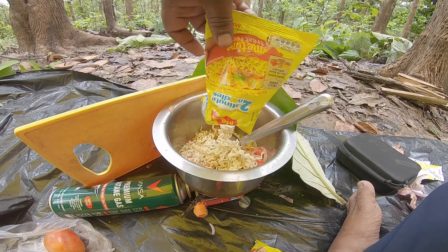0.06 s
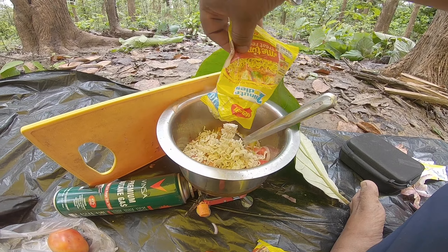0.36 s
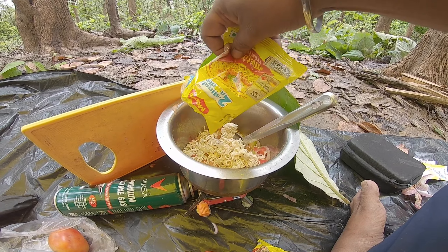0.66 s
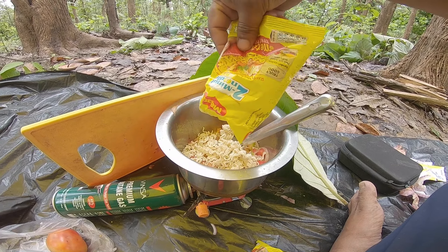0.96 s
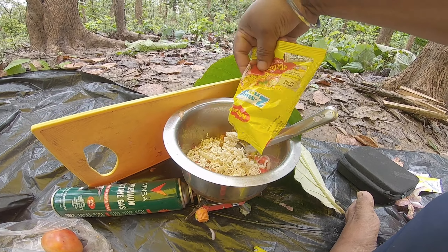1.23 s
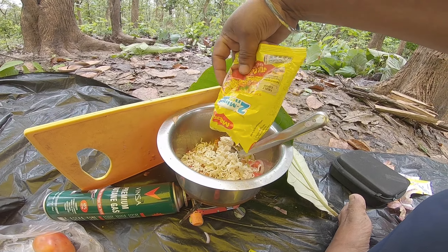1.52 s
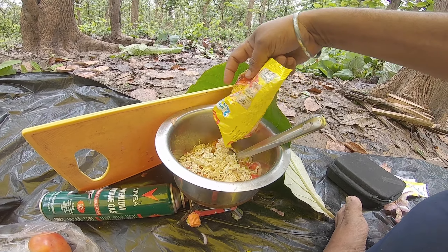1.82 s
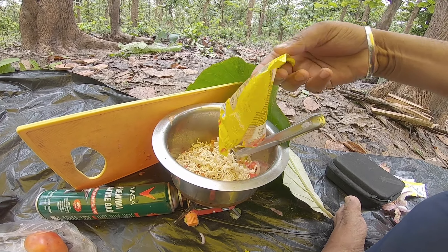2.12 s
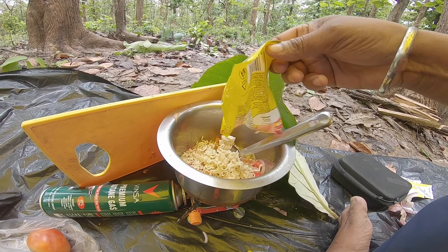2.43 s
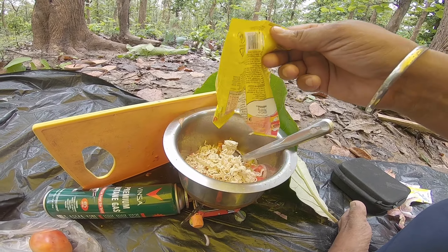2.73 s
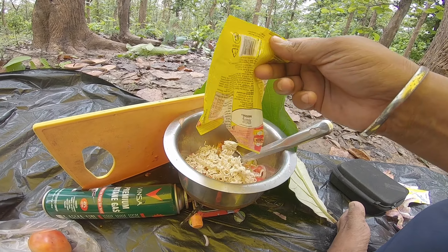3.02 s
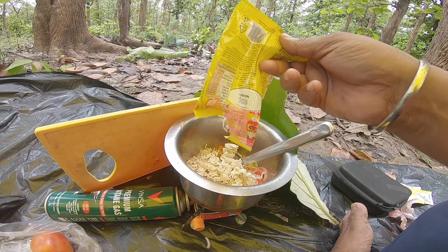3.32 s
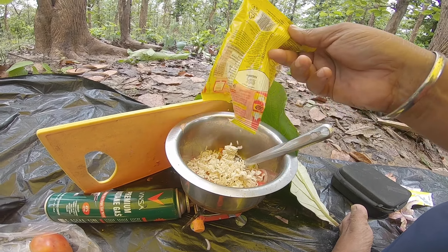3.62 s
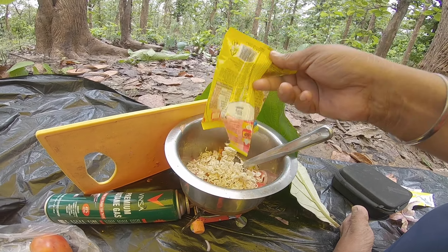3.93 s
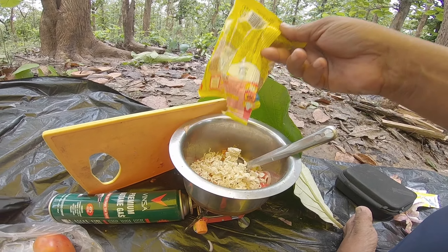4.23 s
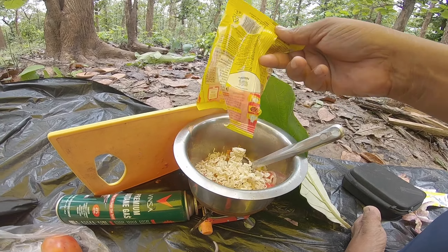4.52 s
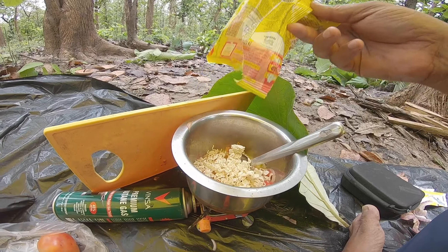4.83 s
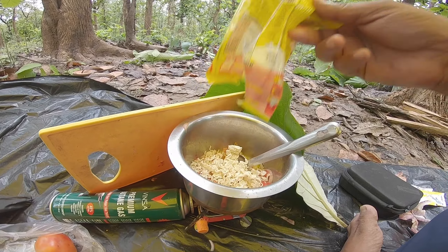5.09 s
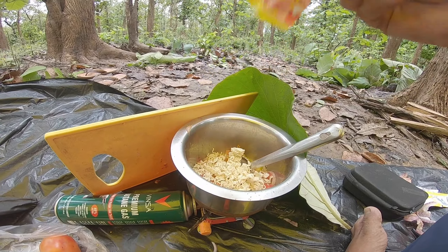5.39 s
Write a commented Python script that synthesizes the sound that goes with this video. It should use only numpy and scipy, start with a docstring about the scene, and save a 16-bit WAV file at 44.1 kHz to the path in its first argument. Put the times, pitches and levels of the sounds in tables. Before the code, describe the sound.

A portable gas stove hisses steadily outdoors for the whole five and a half seconds, with a slight ring from the burner and a faint high crackle. Underneath, the flame throbs softly and a light wind rumbles in short, uneven gusts. From the start, hands work a thin plastic packet close by. Quick crinkles cluster around 0.5 seconds and again from 1 to 1.5 seconds, mixed with light fingertip taps and brief swishes of plastic sliding over itself. A sharp crinkle comes at 1.8 seconds, and the handling eases shortly after 2 seconds. Another spell of squeezing and rustling runs from about 2.8 to 4 seconds, with a distinct tap near 3.3 seconds. After that the packet grows quieter, leaving a few small crinkles and tiny sharp ticks between 4.4 and 5.5 seconds. Everything sounds close and straight ahead.

```python
"""A portable gas stove hisses steadily throughout, under a pot, outdoors beneath a tarp.
Its gas jet rings in the burner, while the flame and a light wind rumble below.
Close by, hands work a thin packet: tiny creases slip and make it rustle in spells,
folds buckle in short crinkles, film slides over film, fingers tap it,
and stiff creases flip with tiny sharp ticks."""
import sys
import numpy as np
from scipy import signal
from scipy.fft import rfft, irfft, next_fast_len
from scipy.io import wavfile

SR = 44100
rng = np.random.default_rng(int(sys.argv[2]) if len(sys.argv) > 2 else 0)


def int16_out(signal):
    """Quantize to a 16-bit WAV file."""
    q = np.round(np.clip(np.atleast_2d(signal).T, -1, 1) * 32767)
    wavfile.write(sys.argv[1], SR, q.astype(np.int16))


N = 244975


def from_db(db):
    """Turn decibels into a number to multiply a sound by."""
    return 10 ** (np.asarray(db) / 20)


def rms_one(x):
    """Scale a signal so that its average strength (rms) is 1."""
    return x / np.sqrt(np.mean(x ** 2) + 1e-20)


def curve(rows):
    """Join (time_s, value) points with straight lines."""
    return np.interp(np.arange(N) / SR, *np.transpose(rows))


def wobble(rate_hz, limit=1.47):
    """A smooth random wander within +-limit, changing about rate_hz times a second."""
    hz = np.fft.rfftfreq(2 ** 18, 1 / SR)
    noise = rng.standard_normal(2 ** 18)
    slow = irfft(rfft(noise) / (1 + (hz / rate_hz) ** 2))[:N]
    return limit * np.tanh(rms_one(slow) / limit)


def swells(rows, roundness):
    """Each row rises and falls in one arch; a smaller roundness gives a flatter top."""
    power, t = np.zeros(N), np.arange(N) / SR
    for start_s, length_s, level_db in rows:
        inside = (t > start_s) & (t < start_s + length_s)
        arch = np.sin(np.pi * (t[inside] - start_s) / length_s) ** roundness
        power[inside] += (from_db(level_db) * arch) ** 2
    return np.sqrt(power)


def colour(x, tone, resonances=()):
    """Make some pitches stronger and others weaker; white noise keeps its overall level."""
    size = 2 * next_fast_len(N // 2 + 4096)
    hz = np.fft.rfftfreq(size, 1 / SR) + 1e-6
    pitch_hz, level_db = np.transpose(tone)
    db = np.interp(np.log(hz), np.log(pitch_hz), level_db)
    for centre_hz, width_hz, boost_db in resonances:
        db = db + boost_db / (1 + (2 * (hz - centre_hz) / width_hz) ** 2)
    # make the ringing come after each click, never before (minimum phase)
    cepstrum = irfft(np.log(rms_one(from_db(db))))
    cepstrum[1:size // 2] *= 2
    cepstrum[size // 2 + 1:] = 0
    return irfft(rfft(x, size) * np.exp(rfft(cepstrum)))[..., :N]


def band(x, low_hz, high_hz):
    """Keep the pitches between low_hz and high_hz."""
    return signal.sosfilt(signal.butter(2, [low_hz, high_hz], "band", fs=SR, output="sos"), x + 1e-18)


def clicks(per_s, spread_db):
    """Clicks of uneven size at random moments."""
    sizes = from_db(spread_db * np.minimum(rng.exponential(1, N), 4)) * rng.choice([-1, 1], N)
    return rms_one(sizes * (rng.random(N) < per_s / SR))


# The tone of the gas jet: pitch_hz, level_db
JET_TONE = [(200, -6.5), (480, -7), (850, 1.5), (1100, -5.5), (2100, -8.5), (2900, -4), (4500, -2.5),
            (6400, -4), (8300, -1.5), (9500, -12.5), (11000, -20), (14000, -25.5), (16000, -34)]
# Where the burner tube and the gap under the pot ring: pitch_hz, width_hz, boost_db
BURNER_RESONANCES = [(688, 260, 14), (1674, 340, 10.5), (2554, 160, 11.5), (2846, 130, 7.5),
                     (3708, 290, 11.5), (4100, 150, -14), (5565, 1160, 16.5), (7040, 260, 1.5),
                     (8150, 250, 0.5), (12470, 1500, 12.5)]


def gas_hiss(level_db=-49, waver_db=0.2, flutter_db=1.13):
    """The gas jet hisses through the ringing burner, with a slight flutter."""
    jet = rng.standard_normal(N) * from_db(waver_db * wobble(2.8) + flutter_db * wobble(90))
    return from_db(level_db) * colour(jet, JET_TONE, BURNER_RESONANCES)


# The tone of the wind: pitch_hz, level_db
WIND_TONE = [(15, -26.5), (30, -7.5), (52, 0.5), (90, 0.5), (115, -3), (150, -13), (300, -26), (800, -52.5)]
# Gusts of the light wind: start_s, length_s, level_db
WIND_GUSTS = [(0, 0.086, -49), (.25, 0.32, -49), (.73, 0.091, -45), (1.02, 0.11, -47), (1.25, 0.3, -45.5),
              (2.27, 0.16, -46.5), (2.52, 0.067, -50), (2.84, 0.18, -50), (3.13, 0.21, -46.5),
              (3.45, .55, -50.5), (4.08, 0.084, -46.5), (4.35, 0.13, -52), (5.02, 0.14, -48)]
GUST_ROUNDNESS = 0.37


def wind(breeze_db=-54, trim_db=-0.1, buffet_db=2.5):
    """A breeze buffets in the deep bass, with gusts on top."""
    blowing = np.hypot(from_db(breeze_db), swells(WIND_GUSTS, GUST_ROUNDNESS))   # hypot adds powers
    air = colour(rng.standard_normal(N), WIND_TONE)
    return air * blowing * from_db(trim_db + buffet_db * wobble(11))


# The tone of the flame: pitch_hz, level_db
FLAME_TONE = [(70, -19.5), (120, -5.5), (150, 1), (186, 2), (230, -5.5), (280, -8.5), (350, -18),
              (520, -25.5), (1000, -46)]
# Moments when its roar swells: start_s, length_s, level_db
FLAME_FLARES = [(.27, 0.084, -48), (.53, 0.073, -45), (1.19, 0.15, -47.5), (1.68, .08, -52),
                (2.03, 0.12, -47), (2.82, 0.26, -45), (3.23, 0.083, -42.5), (4.2, 0.14, -53)]


def flame(steady_db=-50.5, gust_share=0.18, throb_db=1.9):
    """The flame throbs about an octave above the wind, fanned by the gusts."""
    fanned = from_db(steady_db) + gust_share * swells(WIND_GUSTS, GUST_ROUNDNESS)
    roaring = np.hypot(fanned, swells(FLAME_FLARES, roundness=0.35))
    roar = colour(rng.standard_normal(N), FLAME_TONE)
    return roar * roaring * from_db(throb_db * wobble(24))


# The tone of the faint crackle: pitch_hz, level_db
CRACKLE_TONE = [(2300, -6), (3500, 3.0), (5500, -3.5), (7200, 1.5), (8500, -2), (10500, -19.5),
                (13000, -12), (16000, -18.5)]


def fine_crackle(level_db=-56.5, clump_db=10.0, patchy_db=10.0):
    """Faint high crackle runs through the hiss, each little spurt at a pitch of its own."""
    shared_db, spurts = clump_db * wobble(120), 0
    edges_hz = np.geomspace(2300, 16000, 15)
    for low, high in zip(edges_hz, edges_hz[1:]):
        crackle = band(clicks(per_s=5000, spread_db=3.0), low, high)
        spurts += crackle * from_db(shared_db + patchy_db * wobble(130))
    return from_db(level_db) * colour(rms_one(spurts), CRACKLE_TONE)


# How hard the hands work the packet between squeezes: time_s, level_db
HAND_EFFORT = [(0, -50.5), (.7, -48.5), (1.0, -45), (1.25, -40), (1.45, -43), (1.58, -49.5), (1.78, -45.5),
               (1.98, -43), (2.2, -50.5), (2.55, -47.5), (2.72, -52), (3.02, -44), (3.4, -49), (3.9, -50.5),
               (4.3, -55.5), (5.55, -50.5)]
# Squeezes of the packet: start_s, length_s, level_db
HAND_SQUEEZES = [(.11, 0.054, -47), (.275, 0.065, -40.5), (.5, 0.12, -36.5), (1.035, 0.1, -38.5),
                 (1.81, 0.018, -35.5), (2.41, 0.026, -46), (2.56, 0.062, -47), (2.81, 0.064, -37),
                 (2.96, 0.056, -41), (3.22, 0.13, -37), (3.5, 0.076, -39.5), (3.685, 0.067, -39.5),
                 (3.9, 0.052, -42), (4.11, 0.046, -43), (5.085, 0.034, -42)]


def handling():
    """How strongly the packet is worked: steady effort, with squeezes on top."""
    return np.hypot(from_db(curve(HAND_EFFORT)), swells(HAND_SQUEEZES, roundness=0.87))


# The tone of the packet's thin film: pitch_hz, level_db
FILM_TONE = [(150, -5.5), (400, -8), (700, 1.5), (1100, -2.5), (2000, -1.5), (3300, 0.5), (4400, 0.5),
             (5600, -9), (7000, -0.5), (8300, -10), (10500, -18), (12500, -21), (16000, -27)]
# Where the hollow inside the packet rings: pitch_hz, width_hz, boost_db
PACKET_RESONANCES = [(660, 136, 5.5), (1610, 295, 6), (3450, 88, 4)]
# The pitch that the grip brings out in the film: time_s, pitch_hz
GRIP_PITCH = [(0, 3000), (.9, 2900), (1.08, 845), (1.33, 756), (1.41, 3280), (2.1, 3050), (2.5, 1730),
              (3.2, 1490), (3.7, 1840), (3.95, 2730), (5.55, 2870)]


def rustle(level_db=-4.5, clump_db=3.5, patchy_db=3.5, grip_db=4.0, grip_octaves=0.62):
    """Tiny creases slip in clumps, each clump favouring its own range of pitches."""
    shared_db, grip_hz, creases = clump_db * wobble(55), curve(GRIP_PITCH), 0
    edges_hz = [150, 600, 1250, 1950, 2800, 4000, 8000, 19000]
    for low, high in zip(edges_hz, edges_hz[1:]):
        slips = band(clicks(per_s=4500, spread_db=3.0), low, high)
        octaves_away = np.log2(np.sqrt(low * high) / grip_hz)
        nearness = np.exp(-(octaves_away / grip_octaves) ** 2)
        creases += slips * from_db(shared_db + patchy_db * wobble(84) + grip_db * nearness)
    return handling() * from_db(level_db) * rms_one(colour(creases, FILM_TONE, PACKET_RESONANCES))


def crease_pops(level_db=-12.5, per_s=70, cycles=1.9, follow=0.79, range_db=7.5):
    """Single small creases pop and ring for a few cycles, louder while the packet is worked."""
    pops, handling_db = np.zeros(N), 20 * np.log10(handling())
    loudness = from_db(level_db + follow * handling_db + (1 - follow) * handling_db.mean())
    age = np.arange(SR // 100) / SR
    for when, pitch, size in rng.random((int(per_s * N / SR), 3)):
        at, hz = int(when * (N - len(age))), 1900 * 2.5 ** pitch
        ring = np.sin(2 * np.pi * hz * age) * np.exp(-age * hz / cycles)
        pops[at:at + len(age)] += from_db(range_db * size) * ring
    return loudness * rms_one(pops)


# The tone of a crinkle's bright edge: pitch_hz, level_db
EDGE_TONE = [(3000, -37), (5500, -10), (7000, 4.5), (8400, 5.5), (10500, -12.5), (12500, -5.5),
             (16000, -7)]
# Folds buckling: start_s, level_db, crispness_db, pitch_hz
BUCKLING_FOLDS = [(0.0468, -25.5, -19, 3140), (0.114, -30, -20, 2380), (0.13, -34, -22, 2970),
                  (0.160, -29.5, -21, 3620), (0.277, -38, -21, 3250), (0.357, -32.5, -13, 3730),
                  (0.464, -28, -13, 3540), (0.4937, -31, -19, 3400), (0.5062, -29.5, -10, 3320),
                  (0.5334, -33, -6, 3300), (0.546, -32, -6, 3160), (0.567, -31, -7, 3040),
                  (0.5744, -28, -10, 3000), (0.589, -28, -22, 2940), (0.604, -30.5, -12, 3070),
                  (0.6114, -34, -6, 3170), (0.7503, -36, -5, 1690), (0.881, -31, -6.5, 2900),
                  (0.8936, -31, -11, 2800), (0.9487, -36, -22, 2860), (0.9778, -30, -28, 2770),
                  (1.105, -30, -21, 1760), (1.153, -31, -12, 2500), (1.256, -31, -28, 2750),
                  (1.275, -32, -8, 3460), (1.3334, -30, -10, 1800), (1.379, -32, -9, 3600),
                  (1.438, -34, -22, 3400), (1.476, -42.5, 4.5, 3600), (1.4933, -27.5, -22, 3500),
                  (1.602, -32, -20, 3000), (1.8192, -26, -18, 3170), (2.005, -35.5, -19, 3000),
                  (2.0314, -36, -21, 3460), (2.0756, -31, -8, 3400), (2.48, -30, -10, 2800),
                  (2.8362, -30, -13, 1590), (2.974, -34, -24, 1490), (3.117, -34.5, -17, 3250),
                  (3.235, -32.5, -7, 2390), (3.282, -30, -22, 1650), (3.3085, -30.5, -28, 2320),
                  (3.706, -35, -12, 1610), (3.7314, -39, -17, 2480), (3.863, -34, -4, 3220),
                  (3.9444, -33, -14, 3220), (4.326, -32.5, -24, 3400), (4.8343, -32.5, -15, 3700),
                  (5.0944, -39.5, -18, 1520)]


def crinkles(body_db=-9.5, ring_db=-13.0, edge_db=-6.5, sheen_db=-6.0, rise_s=0.0027, ring_ratio=1.049):
    """A buckling fold lets go a quick run of snaps: a papery body, its own pitch and a bright edge."""
    body, rings, edge, sheen = np.zeros((4, N))
    snaps = clicks(per_s=16000, spread_db=1.0)
    for start_s, level_db, crispness_db, pitch_hz in BUCKLING_FOLDS:
        at = int(start_s * SR)
        progress = np.arange(min(SR // 10, N - at)) / SR / rise_s   # 1 at the loudest moment
        span = slice(at, at + len(progress))
        swell = from_db(level_db) * progress ** 2 * np.exp(2 - 2 * progress)
        run = swell * rms_one(snaps[span])
        ring = swell * band(snaps[span], pitch_hz / ring_ratio, pitch_hz * ring_ratio)
        body[span] += from_db(body_db) * run
        rings[span] += from_db(ring_db) * rms_one(ring) * np.std(run)
        edge[span] += from_db(crispness_db + edge_db) * run
        sheen[span] += from_db(2 * crispness_db + sheen_db) * run   # only crisp folds reach the very top
    papery = colour(band(body, 230, 5500), FILM_TONE, PACKET_RESONANCES)
    return papery + rings + colour(edge, EDGE_TONE) + band(sheen, 9300, 13500)


# The tone of rubbing film: pitch_hz, level_db
SWISH_TONE = [(4000, -35), (6500, 6.5), (8600, 7), (10800, -13), (12400, -1), (16000, -24)]
# Film sliding over film: start_s, level_db, length_s
FILM_SLIDES = [(0.53, -52, 0.042), (1.48, -53, 0.033), (2.815, -54, 0.044), (3.69, -47, 0.022),
               (3.843, -51, 0.076), (5.225, -59, .02)]


def slides(chatter_db=2.0):
    """Film rubs on film with a short, bright, grainy swish."""
    strokes, t = np.zeros(N), np.arange(N) / SR
    for start_s, level_db, length_s in FILM_SLIDES:
        progress = np.clip((t - start_s) / length_s, 0, 1)
        strokes += from_db(level_db) * np.sqrt(np.abs(np.sin(np.pi * progress)))
    rub = clicks(per_s=6900, spread_db=-8.0) * from_db(chatter_db * wobble(150))
    return strokes * rms_one(colour(rub, SWISH_TONE))


# Fingers knocking on the packet: start_s, level_db, pitch_hz
FINGER_TAPS = [(0.581, -30.5, 203), (0.7529, -34, 1500), (1.159, -32, 730), (1.19, -33, 1010),
               (1.821, -40, 706), (2.4831, -42, 1640), (3.2827, -28, 1570), (3.2847, -34, 243),
               (5.0957, -36, 2000)]


def taps(cycles=1.76, contact_s=0.00045):
    """A fingertip taps the packet: a dry crack, then a note that dies almost at once."""
    notes, cracks, age = np.zeros(N), np.zeros(N), np.arange(SR // 20) / SR
    for start_s, level_db, pitch_hz in FINGER_TAPS:
        at, gain = int(start_s * SR), from_db(level_db)
        span = slice(at, at + len(age))
        notes[span] += gain * np.sin(2 * np.pi * pitch_hz * age) * np.exp(-age * pitch_hz / cycles)
        cracks[span] += gain * rng.standard_normal(len(age)) * np.exp(-age / contact_s)
    return notes + colour(cracks, FILM_TONE, PACKET_RESONANCES)


# Sharp ticks of the film: start_s, level_db, pitch_hz
FILM_TICKS = [(1.8208, -36, 8200), (2.402, -35, 6800), (3.433, -33.5, 7200), (3.868, -41, 7200),
              (3.879, -36, 8500), (4.469, -33.5, 7500), (4.694, -27.5, 8300), (4.9757, -33, 7300),
              (5.229, -37, 6800), (5.3112, -30.5, 6400), (5.465, -30.5, 8200)]


def ticks(boost_db=6.5, decay_s=0.00027, crack_share=0.31):
    """A stiff crease flips: a crack that rings for a few cycles."""
    flips, age = np.zeros(N), np.arange(SR // 100) / SR
    for start_s, level_db, pitch_hz in FILM_TICKS:
        at = int(start_s * SR)
        ring = np.sin(2 * np.pi * pitch_hz * age) + crack_share * rng.standard_normal(len(age))
        flips[at:at + len(age)] += from_db(level_db + boost_db) * ring * np.exp(-age / decay_s)
    return band(flips, 2400, 10200)


def smear(x, decay_s=0.024):
    """Blur a sound into a brief, dense cloud, as strong as what goes in."""
    age = np.arange(SR // 12) / SR
    cloud = rng.standard_normal(len(age)) * np.exp(-age / decay_s)
    return signal.fftconvolve(x, cloud / np.linalg.norm(cloud))[:N]


def scene(lean_db=-8.0, low_mid_spread_db=-34.0):
    """Everything is close and straight ahead; the highest treble spreads out and leans right."""
    packet = rustle() + crease_pops() + crinkles() + slides() + taps() + ticks()
    centre = gas_hiss() + fine_crackle() + wind() + flame() + packet
    treble = signal.sosfiltfilt(signal.butter(14, 11200, "high", fs=SR, output="sos"), centre)
    low_mid_spread = from_db(low_mid_spread_db) * band(centre, 356, 900)   # a faint low-mid share joins the blurred sides
    side = from_db(lean_db) * treble + smear(treble + low_mid_spread)
    return np.array([centre - side, centre + side])   # left, right


def record(dry, cutoff_hz=15750):
    """Steeply cut away everything above cutoff_hz."""
    return signal.sosfilt(signal.ellip(12, .1, 80, cutoff_hz, fs=SR, output="sos"), dry)


dry = scene()
out = record(dry)
int16_out(out)
```